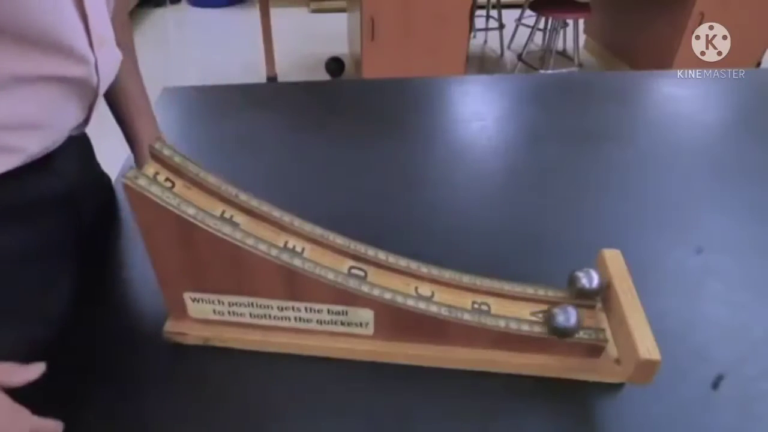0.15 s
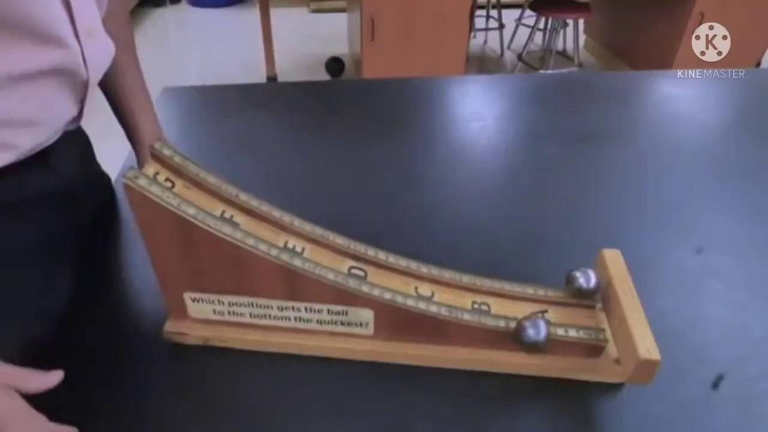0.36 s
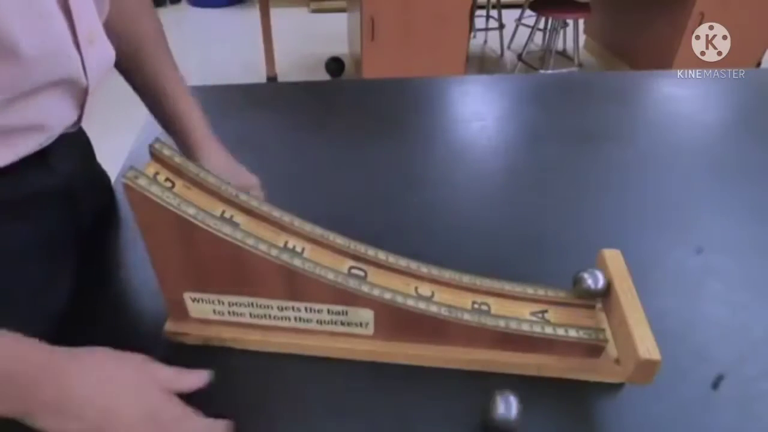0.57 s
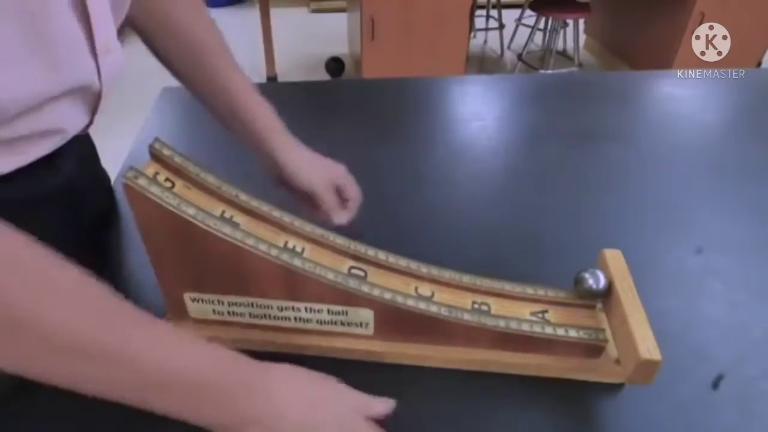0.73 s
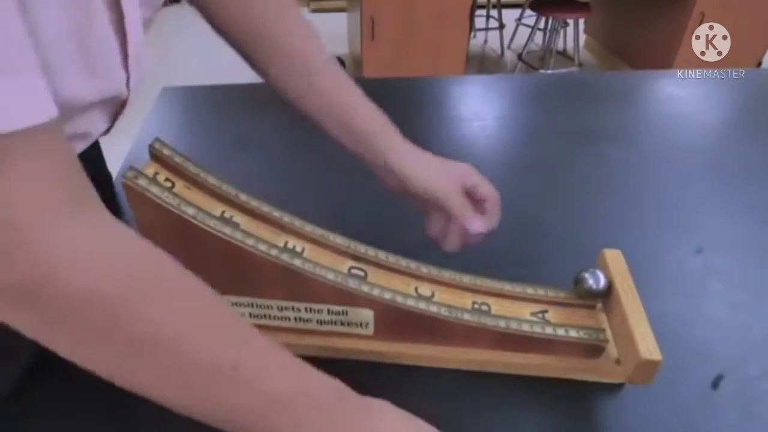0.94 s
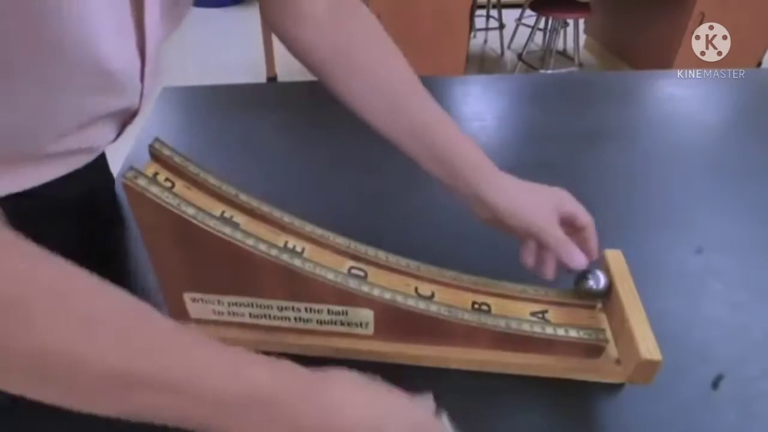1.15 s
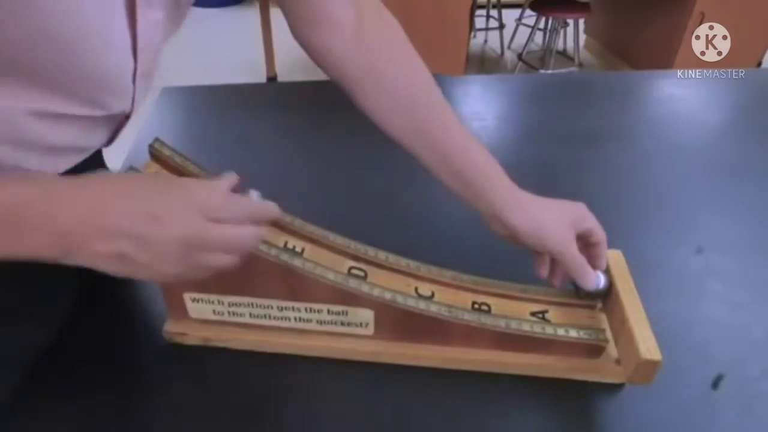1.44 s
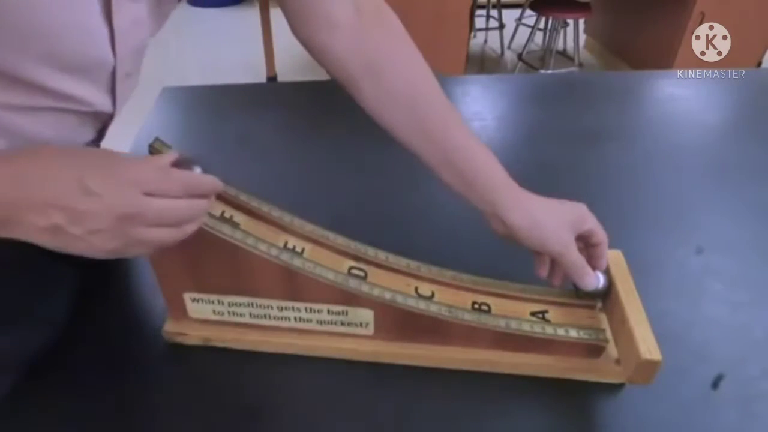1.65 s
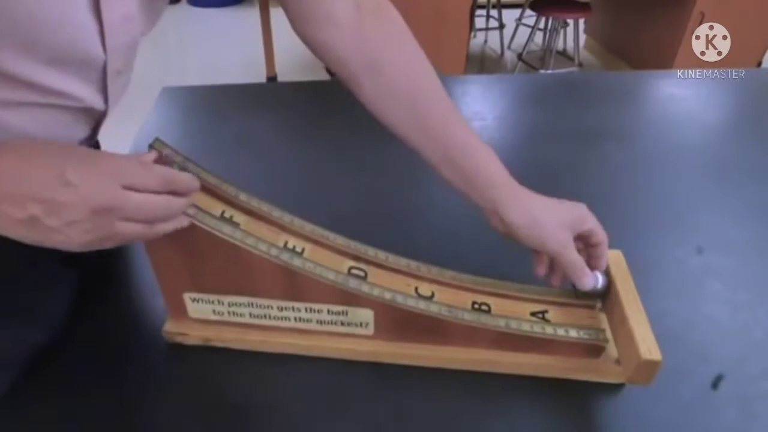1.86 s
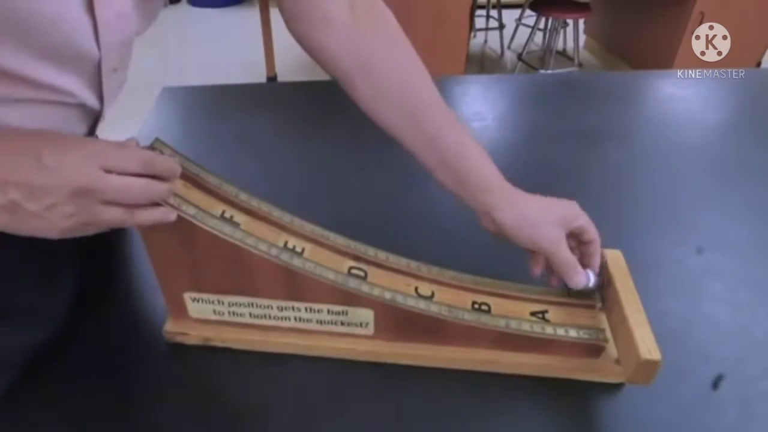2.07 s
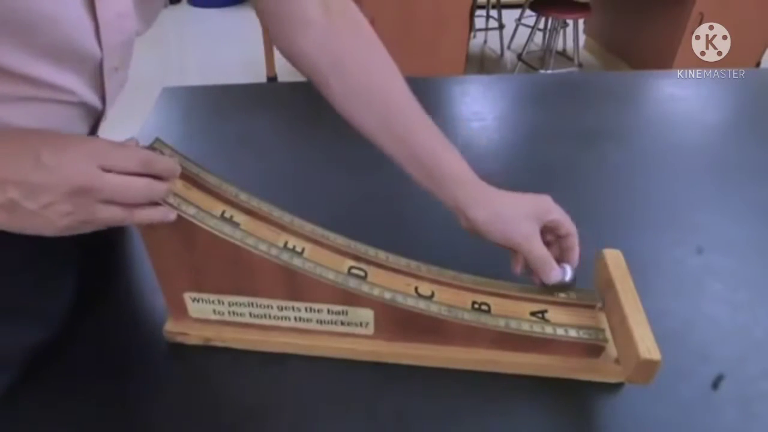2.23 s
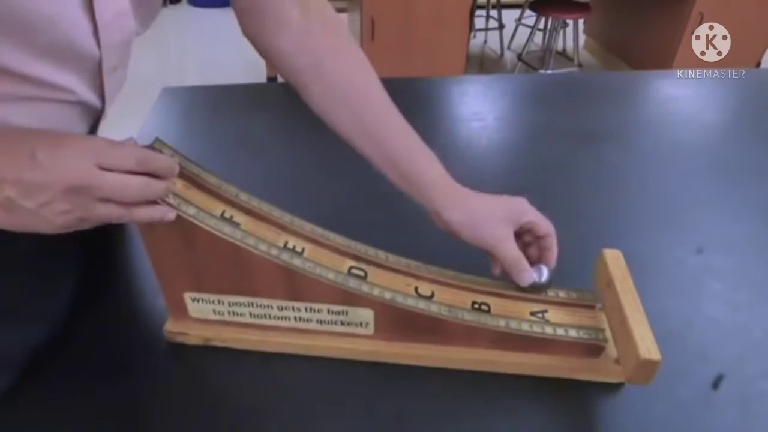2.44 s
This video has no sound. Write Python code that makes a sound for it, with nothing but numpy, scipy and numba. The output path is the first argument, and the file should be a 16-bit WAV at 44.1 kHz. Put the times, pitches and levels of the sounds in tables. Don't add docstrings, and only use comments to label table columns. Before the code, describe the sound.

A steel ball rumbles along a hollow wooden ramp, knocks the end stop sharply at 0.14 s and rattles on the rails until about 0.4. At 0.55 it hits a hard table, bouncing faster and softer until 0.9, with room echo. Ventilation hums; a faint high whistle arches near 1.1. From 1.97, balls are set down with hollow taps and softly shifted, amid faint insect-like ticks.

```python
import sys
import numpy as np
from scipy import signal
from scipy.fft import rfft, irfft, next_fast_len
from scipy.io import wavfile
from scipy.ndimage import map_coordinates
from numba import njit

SR = 44100
rng = np.random.default_rng(int(sys.argv[2]) if len(sys.argv) > 2 else 0)


def put_to_file(sound):
    columns = np.atleast_2d(sound).T
    safe = np.clip(columns, -1, 1)
    whole_steps = np.round(safe * 32767)
    wavfile.write(sys.argv[1], SR, whole_steps.astype(np.int16))


def gain_from_decibels(decibels):
    exponent = np.asarray(decibels, float) / 20
    return 10 ** exponent


N = 114660

# frequency in Hz, level in dB, t60 in seconds.
HOLLOW_MODES = [(236, -1.5, 0.12), (275, 10.5, 0.089), (312, -0.5, 0.099), (348.2, 8.5, .09),
                (396, 7.5, 0.081)]


def unit(x):
    return x / np.sqrt(np.mean(x ** 2) + 1e-20)


def along(points, hz):
    f, v = np.transpose(points)
    return np.interp(np.log(hz + 1), np.log(f + 1), v)


def filtered(x, response):
    m = next_fast_len(x.shape[-1] + 8192)
    spectrum = rfft(x, m) * response(np.fft.rfftfreq(m, 1 / SR))
    return irfft(spectrum, m)[..., :x.shape[-1]]


def band(f, centre_hz, width_hz):
    return 1j * f * width_hz / (centre_hz ** 2 - f * f + 1j * f * width_hz)


def wobble(rate):
    knots = rng.standard_normal(int(N * rate / SR) + 4)
    return map_coordinates(knots, [np.arange(N) * rate / SR])


def fader(rows):
    s, db = np.transpose(rows)
    return gain_from_decibels(np.interp(np.arange(N) / SR, s, db, left=-120, right=-120))


def ring(modes, scatter_db, tilt_db=0, rise=0.0026, rough=0):
    longest = np.array(modes)[:, 2].max()
    t = np.arange(int(SR * min(.25, longest + .01))) / SR
    hz, db, t60 = np.transpose(modes)[:, :, None]
    level_luck, phase = rng.standard_normal((2, len(modes), 1))
    level_db = db + scatter_db * level_luck + tilt_db * np.log2(hz / 1000) - 60 * t / t60
    drift = 0
    if rough:
        steps = rng.standard_normal((len(modes), len(t)))
        drift = rough * np.cumsum(steps, 1) / np.sqrt(SR / 100)
    partials = gain_from_decibels(level_db) * np.sin(2 * np.pi * (hz * t + phase + drift / 4))
    return partials.sum(0) * (1 - np.exp(-t / rise)) / np.sqrt(len(modes))


def crowd(rows, count):
    hz, db, t60 = np.transpose(rows)
    place = (np.arange(count) + rng.random(count)) / count
    f = hz[0] * (hz[-1] / hz[0]) ** place
    level_db = along(np.transpose([hz, db]), f) + 3 * np.log2(f / 1000)
    return np.transpose([f, level_db, along(np.transpose([hz, t60]), f)])


def add(track, s, sound):
    track[round(s * SR):][:len(sound)] += sound


def space(dry, wet_db):
    # frequency in Hz, t60 in seconds.
    decay = [(150, 0.83), (300, 0.59), (600, 0.42), (2000, 0.47), (5000, 0.4), (12000, 0.24)]
    # frequency in Hz, level in dB.
    colour = [(100, 7.5), (250, 3.5), (500, 4.5), (2000, 2), (4000, 1), (7000, -1), (12000, -3)]
    # frequency in Hz, side over mid in dB.
    tail_width = [(100, -16.5), (400, -27.5), (1200, -9), (5000, -8), (12000, -10)]
    # frequency in Hz, side over mid in dB.
    direct_width = [(60, -12.5), (300, -35), (1200, -11.5), (5000, -16.5), (12000, -12.5)]
    hz, t, z = signal.stft(rng.standard_normal((2, int(.8 * SR))), SR, nperseg=256)
    colour_db = along(colour, hz) + np.array([0 * hz, along(tail_width, hz)])
    fading_db = colour_db[..., None] - 60 * t / along(decay, hz)[:, None]
    tail = signal.istft(z * gain_from_decibels(fading_db), SR, nperseg=256)[1]
    tail = gain_from_decibels(wet_db) * tail / np.linalg.norm(tail[0])
    delayed = np.pad(dry, (300, 0))[None]
    mid, side = signal.fftconvolve(delayed, tail, axes=1)[:, :N]
    side = side + filtered(dry, lambda f: -1j * gain_from_decibels(along(direct_width, f)))
    return np.array([dry + mid + side, dry + mid - side])


def air():
    # frequency in Hz, level in dB per Hz.
    spectrum = [(30, 0), (90, -6), (165, 0), (250, -4.5), (420, -19.5), (1200, -24.5), (8700, -34.5),
                (15500, -36.5)]
    # frequency in Hz, left-right likeness from 0 to 1.
    likeness = [(60, 1), (380, 0.9), (2380, 0.35), (15000, 0.27)]

    def mid_side(f):
        angle = np.arccos(np.clip(along(likeness, f), -1, 1)) / 2
        return gain_from_decibels(along(spectrum, f)) * [np.cos(angle), np.sin(angle)]

    mid, side = filtered(rng.standard_normal((2, N)), mid_side)
    whine_hz, whine_db, air_db = 8880, -78, -51.5
    whine = gain_from_decibels(whine_db + 2.6 * wobble(53)) * np.sin(2 * np.pi * whine_hz * np.arange(N) / SR)
    return gain_from_decibels(air_db + 0.66 * wobble(6.3)) * unit(np.array([mid + side, mid - side])) + whine


def squeak():
    # time in seconds, pitch in Hz, level in dB.
    arch = [
        (1.04, 9700, -90),
        (1.09, 10300, -74),
        (1.171, 10930, -73),
        (1.24, 10200, -72),
        (1.28, 9700, -90),
    ]
    t = np.arange(N) / SR
    s, hz, db = np.transpose(arch)
    pitch = np.interp(t, s, hz) * (1 + 0.0054 * wobble(150))
    level_db = np.interp(t, s, db, left=-140, right=-140) + 4.2 * wobble(70.2)
    return gain_from_decibels(level_db) * np.sin(2 * np.pi * np.cumsum(pitch) / SR)


def insect():
    # time in seconds, peak level in dB.
    chirps = [(1.111, -59), (1.181, -59), (1.2118, -64), (1.933, -56), (1.953, -58), (2.082, -55),
              (2.117, -56.5), (2.148, -50), (2.222, -59.5), (2.25, -57), (2.282, -52), (2.3216, -59),
              (2.3498, -50), (2.4156, -50), (2.4528, -54), (2.485, -52), (2.5136, -50.5), (2.5537, -57),
              (2.586, -59)]
    centre_hz, low_hz, low_db, length_s, trim_db = 4620, 1200, -8, .011, -6
    out = np.zeros(N + SR)
    t = np.arange(round(length_s * SR)) / SR
    tones = np.append(centre_hz * np.array([.94, .98, 1.02, 1.06]), low_hz)[:, None]
    tone_db = np.array([-3, -3, -3, -3, low_db])[:, None]
    for s, db in chirps:
        hz = tones * (1 + .02 * rng.standard_normal((5, 1)))
        size = gain_from_decibels(tone_db + 3 * rng.standard_normal((5, 1)))
        voice = (size * np.sin(2 * np.pi * (hz * t + rng.random((5, 1))))).sum(0)
        add(out, s - length_s / 3, gain_from_decibels(db + trim_db) * np.hanning(len(t)) * voice)
    return out[:N]


def hand_sets():
    # time in seconds, peak in dB, brightness in dB, edge tilt in dB per octave.
    contacts = [(1.9720, -29, -4, 1), (1.9926, -45, -7, 1), (2.001, -37.5, 0.5, -6), (2.0110, -43, -3, 0.5),
                (2.028, -32, -36, 2), (2.1650, -31, -8.5, 2), (2.1780, -33, -12, -2.5),
                (2.25, -47.5, -8, -3)]
    # frequency in Hz, level in dB, t60 in seconds.
    edge = [(486.4, -2.5, 0.1), (1410, 2, 0.082), (2160, 0, 0.042), (3480, 3, 0.026), (4700, 3, 0.029),
            (6500, 2, 0.018), (8950, -5.5, 0.015), (14770, -15, 0.02)]
    # frequency in Hz, level in dB, t60 in seconds.
    plank = [(617, 4, 0.085), (1213, -5.5, 0.15), (1430, 1.5, 0.12), (1760, -18, 0.042), (2186, -5, 0.07),
             (3830, -3, .04), (4680, 2, 0.033)]
    out = np.zeros(N + SR)
    for s, db, bright_db, tilt_db in contacts:
        add(out, s, gain_from_decibels(db) * ring(HOLLOW_MODES, 2.6, rise=0.0014))
        add(out, s, gain_from_decibels(db + bright_db) * ring(crowd(edge, count=80), 2.3, tilt_db, rise=0.00052))
        add(out, s, gain_from_decibels(db + bright_db) * ring(plank, 0.7, rise=0.002, rough=0.49))
    return out[:N]


def hand_nudges():
    # time in seconds, thud in dB, scuff in dB, scuff tilt in dB per octave.
    touches = [(2.3897, -50.5, -42.5, 3), (2.3950, -38, -47, -5.5), (2.419, -51.5, -49, 2),
               (2.4765, -52, -43, 2), (2.485, -48, -52.5, 3), (2.5425, -52.5, -46.5, 1),
               (2.55, -52.5, -51, -1.5)]
    # frequency in Hz, level in dB, t60 in seconds.
    scuff = [(701.5, 3.5, 0.13), (1210, 1.5, .12), (1705, 2, 0.1), (2250, 0, 0.051), (2840, -2.5, .08),
             (4560, -10, 0.052), (5700, -9, 0.033), (9000, -23, .02), (14000, -28, .015)]
    out = np.zeros(N + SR)
    for s, thud_db, scuff_db, tilt_db in touches:
        add(out, s, gain_from_decibels(thud_db) * ring(HOLLOW_MODES, 3.3, rise=0.00083))
        add(out, s, gain_from_decibels(scuff_db) * ring(crowd(scuff, count=60), 2.1, tilt_db, rise=0.00076))
    return out[:N]


def body(f):
    # frequency in Hz, width in Hz, level in dB.
    resonances = [(156, 20, 9.5), (225, 40, -9), (325, 150, 12), (425, 70, -7.5), (550, 20, 3),
                  (790, 45, 5.5), (1480, 83, -17.5), (2640, 900, -19), (3670, 400, -22.5)]
    return sum((-1) ** k * gain_from_decibels(db) * band(f, hz, width_hz)
               for k, (hz, width_hz, db) in enumerate(resonances))


def rolling():
    # time in seconds, rumble in dB, grit in dB.
    roll = [(0.0, -23.5, -38.5), (0.04, -22, -35), (0.088, -28, -29), (0.125, -25, -29.5),
            (0.16, -25, -30.5), (0.18, -28.5, -43), (0.206, -27.5, -44), (0.248, -34, -50.5),
            (0.34, -32, -54.5), (0.4, -37.5, -52.5), (0.44, -49, -63.5), (0.53, -59, -65)]
    # frequency in Hz, level in dB per Hz.
    grit_colour = [(880, -30), (1500, -2), (1950, -9), (3510, 0.5), (8050, -18), (10300, -29), (15500, -36)]
    # time in seconds, level in dB.
    finger_shift = [(1.97, -47.5), (2.012, -49), (2.133, -47), (2.251, -47.5), (2.358, -59), (2.47, -48.5),
                    (2.6, -55)]
    # time in seconds, level in dB.
    bench = [
        [(0, -41.5), (.2, -43), (.4, -36), (.45, -42), (.53, -52)],
        [(1.97, -46), (2.37, -55), (2.41, -46), (2.52, -41), (2.6, -60)],
    ]
    s, rumble_db, grit_db = np.transpose(roll)
    force = rng.standard_normal((3, N)) * gain_from_decibels(2.16 * wobble(53) + 2.5 * wobble(250))
    grains = rng.standard_normal(N) * gain_from_decibels(1.8 * wobble(100) + 4.1 * wobble(400))
    rumble = filtered(force[0], body)
    grit = filtered(grains, lambda f: gain_from_decibels(along(grit_colour, f)))
    shift = filtered(force[1], lambda f: body(f) / (1 + 1j * f / 442) ** 2)
    drone = filtered(force[2], lambda f: band(f, 163, 29) ** 2)
    out = fader(np.transpose([s, rumble_db])) * unit(rumble)
    out += fader(np.transpose([s, grit_db])) * unit(grit)
    out += fader(finger_shift) * unit(shift)
    return out + sum(fader(rows) for rows in bench) * unit(drone)


def rail_clicks():
    # time in seconds, peak in dB.
    clicks = [(.031, -25), (.063, -14.5), (.089, -14.5), (.094, -22.5), (.1, -21.5), (.108, -29),
              (0.117, -26), (0.125, -12.5), (.13, -15), (0.133, -15), (0.159, -18.5), (.203, -10),
              (0.214, -20.5), (.240, -21.5), (0.276, -16.5), (.310, -18), (0.321, -21.5), (0.337, -19.5),
              (0.36, -22), (0.375, -26.5)]
    # frequency in Hz, level in dB, t60 in seconds.
    steel = [(1992, -11.5, .02), (3200, -2, 0.039), (4160, -1, 0.018), (6560, -6, 0.02),
             (9000, -14.5, 0.026), (14920, -19, .02)]
    wood = [(1557, 4.5, 0.045), (1444, 0.5, 0.043), (867, 1, 0.061), (611.5, -5.5, .07)]  # Hz, dB, t60 s
    click_db, wood_db = -6, 3.5
    free_s, damped_db = .15, -6.5
    out = np.zeros(N + SR)
    for s, db in clicks:
        press_db = damped_db * (s < free_s)
        add(out, s, gain_from_decibels(db + click_db) * ring(crowd(steel, count=80), 6.0, rise=0.00074))
        add(out, s, gain_from_decibels(db + click_db + wood_db + press_db) * ring(wood, 2.7, rise=0.0029))
    return out[:N]


def stop_knocks():
    # time in seconds, peak in dB, clack tilt in dB per octave.
    knocks = [(0.1405, -3.5, -4.5), (0.1477, 6.5, 2), (.1505, 5.5, -3), (.165, -10.5, -6),
              (.183, -13.5, -6.5), (.222, -21.5, -7.5), (.232, -18.5, -10)]
    # frequency in Hz, level in dB, t60 in seconds.
    lasting = [(312, -5.5, .2), (575.8, 0, 0.14), (621.6, 2, 0.2), (765, -3, 0.18), (870, -1.5, 0.053),
               (1070, -5, .06), (1484, -3, .1), (1637, 6, 0.04), (3740, -15, 0.25)]
    # frequency in Hz, level in dB, t60 in seconds.
    clack = [(401, -12, 0.013), (740, 7, 0.03), (1500, -3.5, 0.019), (3000, -8.5, 0.023),
             (4500, -10.5, 0.012), (6000, -27, .01), (12460, -30.5, .015)]
    out = np.zeros(N + SR)
    for s, db, tilt_db in knocks:
        add(out, s, gain_from_decibels(db - 12) * ring(lasting, 2.3, rise=0.0035, rough=.9))
        add(out, s, gain_from_decibels(db) * ring(crowd(clack, count=40), 5.1, tilt_db))
    return out[:N]


def table_bounces():
    # time in seconds, peak in dB.
    bounces = [(.5487, 4.5), (.6700, 2), (.7455, 0), (.7945, -1.5), (.8270, -4), (.8500, -8),
               (.8660, -11.5), (.8780, -14.5), (.8890, -29), (.8990, -25)]
    # frequency in Hz, level in dB, t60 in seconds.
    clack = [(260.7, -10.5, 0.026), (425, 0, 0.012), (620, 0.5, 0.021), (783, 5.5, 0.023),
             (1427, 2.5, .018), (2800, 1.5, 0.019), (4140, -3, 0.011), (6700, -19.5, 0.012),
             (14050, -37, 0.012)]
    # frequency in Hz, level in dB, t60 in seconds.
    hum = [(1444, -10.5, 0.13), (748, -10, .12), (954, -12, 0.05), (1917, -15.5, .1)]
    # delay in seconds, level in dB.
    echoes = [(0.0045, -7), (0.0092, -5.5), (0.016, -8)]
    out = np.zeros((2, N))
    for k, (s, db) in enumerate(bounces):
        one = np.zeros(N)
        modes = crowd(clack, count=110)
        tilt_db = -0.47 * k
        add(one, s, gain_from_decibels(db) * ring(modes, 1.5, tilt_db, rise=.0001 + 0.0001 * k))
        hum_db = db + min(k, 4)
        add(one, s, gain_from_decibels(hum_db) * ring(hum, 0.82, rise=0.0026, rough=0.31))
        pulse_s, pulse_db = .00004 + .00002 * k, db + 2.5 - 0.5 * k
        u = np.arange(400) / SR / pulse_s
        add(one, s, -gain_from_decibels(pulse_db) * u * u * (3 - u) * np.exp(-u))
        for delay, echo_db in echoes:
            echo = ring(crowd(clack, count=60), 2.4, tilt_db - 3, rise=0.00022)
            add(one, s + delay, gain_from_decibels(db + echo_db) * echo)
        if k == 0:
            add(one, .5432, gain_from_decibels(-20) * ring(modes, 2.5, -2.5, rise=0.0016))
        out += space(one, wet_db=-6.5)
    return out


def scene():
    near = insect() + hand_sets() + hand_nudges() + rolling() + rail_clicks() + stop_knocks()
    return air() + squeak() + space(near, wet_db=-13) + table_bounces()


@njit
def follow(power, up, down):
    out, level = np.empty_like(power), power[0]
    for i in range(len(power)):
        level += (up if power[i] > level else down) * (power[i] - level)
        out[i] = level
    return out


def top_cut(x):
    return signal.sosfilt(signal.butter(12, 15730, fs=SR, output="sos"), x)


def record(dry):
    low_hz, top_hz = 97.7, 15050
    dry = filtered(dry, lambda f: (1j * f / (low_hz + 1j * f)) ** 4 / (1 + (f / top_hz) ** 90))
    dry = filtered(dry, lambda f: 1 - 0.98 * band(f, 493, 83))
    knee_db, squeeze, grip_s, let_go_s = -12.5, 0.96, 0.014, 0.063
    power = follow((dry ** 2).mean(0), 1 / (grip_s * SR + 1), 1 / (let_go_s * SR + 1))
    over_db = np.maximum(10 * np.log10(power + 1e-12) - knee_db, 0)
    x = dry * gain_from_decibels(-squeeze * over_db)
    x = x / (1 + np.abs(x / .95) ** 4) ** (1 / 4)
    return top_cut(x)


dry = scene()
out = record(dry)
put_to_file(out)
```